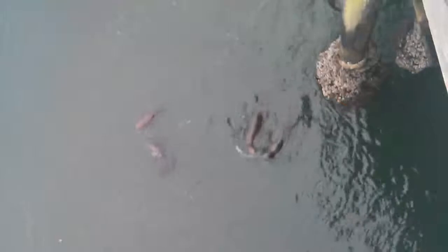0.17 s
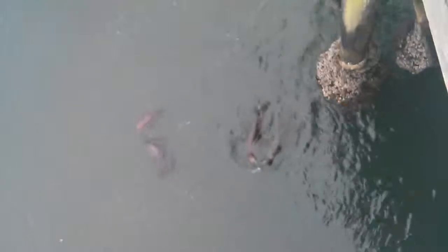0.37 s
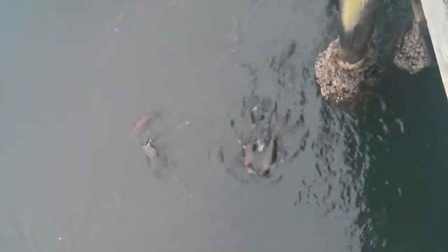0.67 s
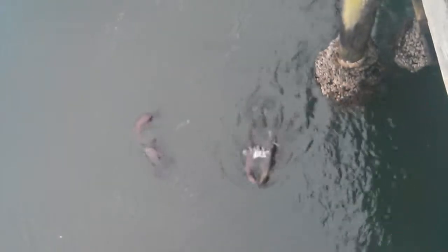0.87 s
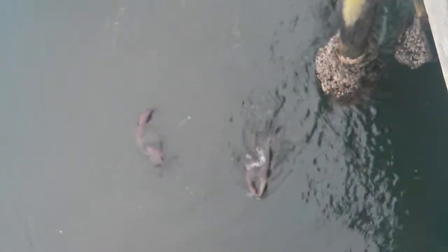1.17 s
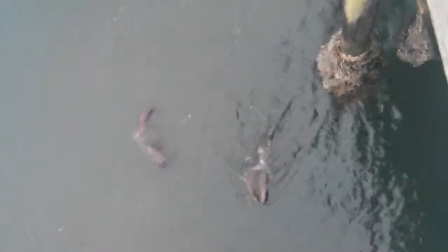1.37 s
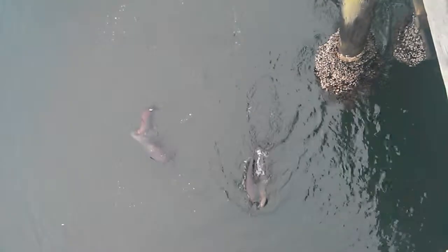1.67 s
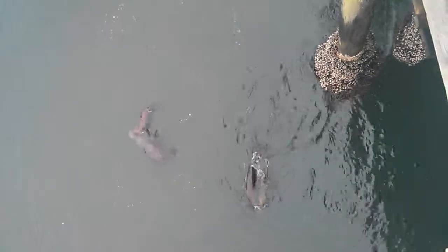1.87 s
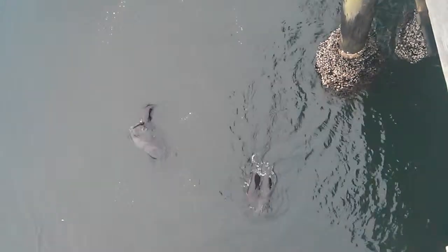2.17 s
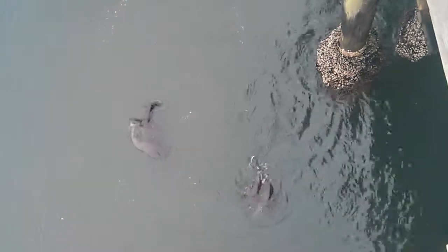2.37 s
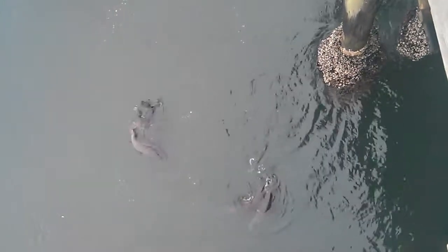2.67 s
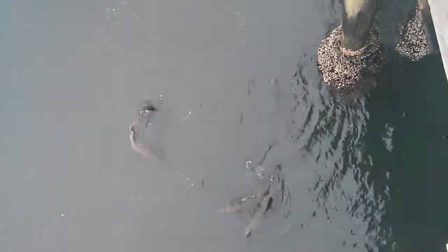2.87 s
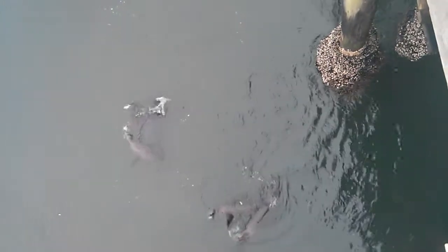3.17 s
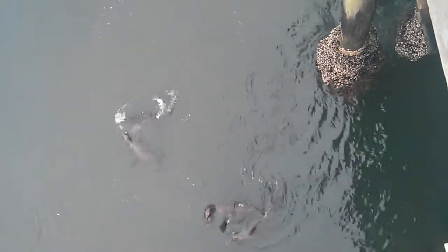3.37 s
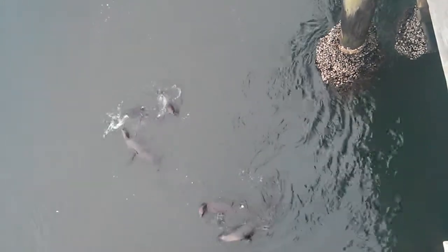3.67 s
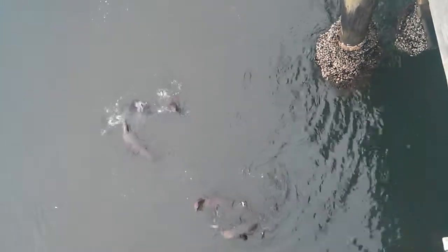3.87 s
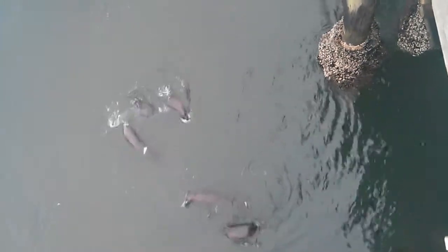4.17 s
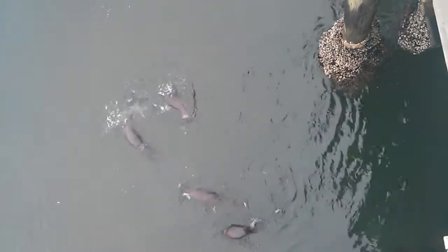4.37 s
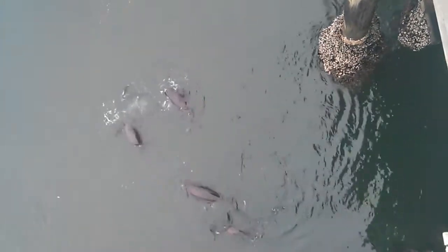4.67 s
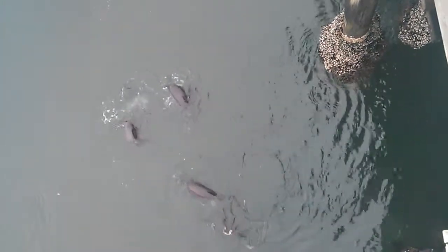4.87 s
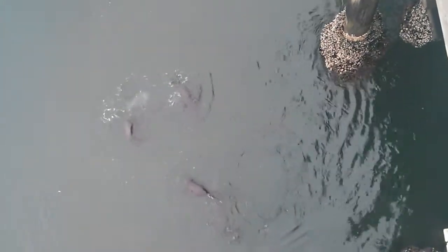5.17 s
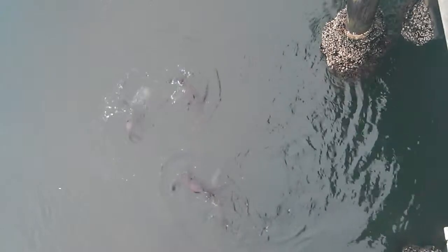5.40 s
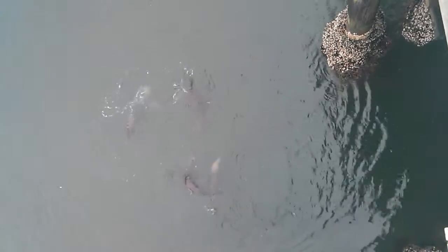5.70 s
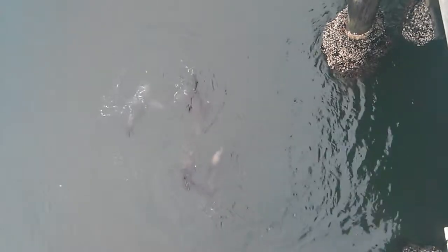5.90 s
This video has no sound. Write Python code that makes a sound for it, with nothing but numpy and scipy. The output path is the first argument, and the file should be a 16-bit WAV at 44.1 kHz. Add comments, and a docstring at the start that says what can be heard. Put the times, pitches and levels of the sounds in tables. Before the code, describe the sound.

Faint splashing from sea lions continues as a loud, nearly pure fog horn tone sounds once, drops softer and stops.

```python
"""A fog horn sounds one two-second blast over a harbour. Its diaphragm drives an almost pure tone
that scoops up to pitch, holds, sinks to a softer level and stops with short echoes from the pier.
Below the pier sea lions roll and splash: drops slap, bubbles ring, foam ticks. There is one dull
knock close by. A distant motor drones over low waterfront rumble, faint hiss and a thin whine."""
import sys
import numpy as np
from scipy import signal
from scipy.fft import rfft, irfft
from scipy.io import wavfile
from scipy.ndimage import uniform_filter1d, map_coordinates

SR = 44100
rng = np.random.default_rng(int(sys.argv[2]) if len(sys.argv) > 2 else 0)


def pcm_store(signal):
    """Save signal as 16-bit PCM."""
    levels = np.round(np.clip(np.atleast_2d(signal), -1, 1) * 32767)
    wavfile.write(sys.argv[1], SR, levels.astype(np.int16).T)


N = 266275
T = np.arange(N) / SR

# noise spectra: freq_hz, relative_density_db
HISS_SPECTRUM = [(2500, -9.5), (8500, -0.5), (12400, -2), (15800, -5)]
RUMBLE_SPECTRUM = [(25, -22), (40, -18.5), (60, -11), (85, -9.5), (122, 3), (160, -9), (220, -6),
                   (320, -11.5), (500, -26), (900, -28.5)]
SPRAY_SPECTRUM = [(5500, -25), (6800, -8), (8200, -1), (9500, -4.5), (11000, -9), (13000, -11.5),
                  (15800, -24)]
DROP_SPECTRUM = [(2400, -7), (3200, -13.5), (3800, -6.5), (4350, -1), (4900, 2), (5500, -3), (6300, -4.5),
                 (7500, -11.5)]
SLOSH_SPECTRUM = [(180, -17), (300, 0.5), (500, -1.5), (750, -3), (1000, 1.5), (1400, 0), (1900, -2),
                  (2300, -3), (3000, -12)]
HORN_AIR_SPECTRUM = [(150, -6), (320, 1.5), (480, 2.5), (600, 0), (880, 2.5), (1050, -17.5), (2200, -20)]
# waterfront rumble contour: time_s, relative_level_db
RUMBLE_CONTOUR = [(0.4, -52), (0.98, -50.5), (2.43, -61), (3.11, -58.5), (6.0, -60)]
# motor pitch, one list per pull: time_s, pitch_hz
MOTOR_PULLS = [
    [(0, 161), (.95, 154), (1.2, 159), (1.47, 171), (2.5, 196)],
    [(3.42, 143), (3.85, 150), (4.3, 153)],
    [(4.35, 190), (4.55, 179), (4.9, 181), (5.3, 176), (6.3, 182)],
]
# motor resonances: centre_hz, half_width_hz, level_db
MOTOR_RESONANCES = [(149.5, 6.5, -48), (171.5, 5, -44.5)]
# rising bubble swarms: centre_s, sigma_s, pitch_hz, level_db
BUBBLE_SWARMS = [(0.406, 0.12, 1680, -53.5), (0.833, 0.23, 620, -56), (3.35, 0.089, 1705, -51.5),
                 (3.6, 0.16, 1890, -57), (3.886, 0.073, 1514, -53), (4.914, 0.073, 1750, -61.5),
                 (5.349, .15, 2138, -73), (5.97, 0.24, 861, -70.5)]
# sea lions surfacing: peak_s, drops_db, swell_s, t60_s, spray_offset_db, slosh_offset_db
SEA_LION_SPLASHES = [(.13, -52.5, 0.07, 2, 5, 3), (.38, -52, 0.026, 1.2, 5.5, 3),
                     (.95, -51.5, .21, 1.34, 3, 2.5), (1.15, -49, 0.16, 0.95, 1.5, 3),
                     (2.22, -67, 0.056, 0.37, 8.5, 4), (2.92, -63.5, 0.046, .4, 10, -6),
                     (3.16, -55, 0.098, 2.1, 8, 1.5), (3.36, -42, 0.051, 0.88, 4.5, -7.5),
                     (3.78, -51.5, 0.25, 0.7, 2.5, -5.5), (4.161, -56.5, 0.17, 1.5, 5.5, -4),
                     (4.41, -58, 0.19, .55, 5.5, 2.5), (4.74, -66, 0.12, 1.4, 7.5, -0.5),
                     (5.7, -77.5, 0.095, 1.5, 16, 0)]
# ring of the drops, lower as they get larger, used as a ratio to its median: time_s, pitch_hz
DROP_CONTOUR = [(0, 5374), (1.2, 5826), (2.0, 4939), (3.0, 4871), (4.5, 4813), (6, 4585)]
# single air pockets and drops: start_s, pitch_hz, level_db
AIR_POCKETS = [(.226, 2640, -41), (0.6459, 1453, -37), (.837, 720, -33), (.878, 640, -34.5),
               (1.037, 1050, -33.5), (1.436, 3980, -47.5), (1.572, 2130, -50.5), (2.191, 4620, -51.5),
               (2.252, 4804, -48.5), (2.32, 4700, -54.5), (2.75, 1850, -41), (2.925, 4550, -47),
               (3.061, 4900, -43), (3.138, 1146, -41), (3.32, 1315, -36.5), (3.364, 157.5, -27),
               (3.379, 125, -27), (3.6, 1420, -37.5), (3.715, 970, -36.5), (4.031, 4780, -46.5),
               (4.29, 1800, -46.5), (4.364, 1300, -36.5), (4.368, 561, -26), (4.377, 743, -31.5),
               (4.508, 4720, -46), (4.58, 4070, -48.5), (4.616, 4040, -50), (4.729, 700, -42.5),
               (4.902, 4000, -50), (5.194, 4790, -50.5), (5.434, 4510, -52), (5.637, 733, -40.5),
               (5.813, 3970, -51)]
# hits on the water: start_s, centre_hz, peak_db, t60_s
WATER_SLAPS = [(.369, 7400, -28.5, .03), (.383, 8100, -27.5, 0.05), (.901, 7550, -24.5, 0.049),
               (1.8205, 14000, -18, .008), (1.821, 9640, -27.5, 0.0086), (2.077, 14370, -39.5, .022),
               (2.243, 7480, -37.5, 0.022), (2.458, 9600, -35, 0.025), (2.823, 7000, -26, .01),
               (2.823, 4530, -32.5, .014), (2.898, 10300, -35.5, 0.013), (3.219, 8060, -26.5, 0.019),
               (3.326, 7200, -24, 0.044), (3.471, 13500, -25.5, 0.011), (3.66, 6800, -30, 0.021),
               (3.868, 7300, -30.5, .015), (4.108, 8050, -30.5, 0.016), (4.147, 7900, -31, 0.015),
               (4.365, 4750, -33.5, 0.064), (4.368, 9000, -26.5, .036), (4.776, 7930, -41.5, .016),
               (5.205, 8360, -48, 0.15), (5.816, 8100, -39.5, 0.024)]
# modes of the knock: freq_hz, level_db, t60_s
KNOCK_MODES = [(56, -36, 0.18), (127, -25.5, .09), (222, -24, 0.017), (338, -27.5, 0.073),
               (614, -31.5, 0.018), (970, -34, 0.026)]
# horn overtones: pitch_multiple, loud_level_db, share_of_level_change
HORN_OVERTONES = [(2, -46, 0.78), (3, -70.5, 0.22), (4, -78, 0.2)]
# pier reflections: delay_s, gain_db
PIER_ECHOES = [(.0253, -15.5), (.0605, -20), (.0727, -22), (.1394, -25)]

FOAM_FADE_AT_S, FOAM_T60_S = 4.36, 3.5
HORN_ON_S, HORN_OFF_S, ATTACK_S, RELEASE_TAU_S = 1.068, 3.069, .022, .003
HORN_HZ, SCOOP_HZ, SCOOP_TAU_S, SHARP_HZ, SETTLE_TAU_S = 417.3, 48, .017, 1.1, .4
LOUD_DB, SOFT_DB, SINK_AT_S, SINK_TAU_S = -8.3, -29.1, 2.228, .089
FIFTH_RELATIVE_DB, FIFTH_AT_S, FIFTH_RISE_S = -51, 1.55, .25


def undb(db):
    """Decibels to gain."""
    return 10 ** (np.asarray(db) / 20)


def unit(x):
    """Scale to rms 1."""
    return x / np.sqrt(np.mean(x ** 2))


def since(start_s):
    """Seconds since start_s, zero before it."""
    return np.maximum(T - start_s, 0)


def contour(points):
    """Interpolate (time_s, value) points to every sample."""
    return np.interp(T, *np.transpose(points))


def fade(t, t60_s):
    """Exponential decay, 60 dB down at t60_s."""
    return np.exp(-np.log(1000) * t / t60_s)


def walk(rate_hz):
    """Smooth random wander, rms 1."""
    freq_hz = np.fft.rfftfreq(N, 1 / SR)
    return unit(irfft(rfft(rng.standard_normal(N)) * np.exp(-(freq_hz / rate_hz) ** 2), N))


def colour(x, spectrum):
    """Filter x by a spectrum, falling 36 dB per octave beyond its ends; rms 1."""
    hz, db = np.transpose(spectrum)
    octave = np.log2(np.fft.rfftfreq(N, 1 / SR) + 1)
    beyond_oct = np.abs(octave - np.clip(octave, np.log2(hz[0]), np.log2(hz[-1])))
    gain_db = np.interp(octave, np.log2(hz), db) - 36 * beyond_oct
    return unit(irfft(rfft(x) * undb(gain_db), N))


def add(out, start_s, sound):
    """Mix a sound into out at start_s."""
    i = int(np.clip(start_s * SR, 0, N - 1))
    out[i:i + len(sound)] += sound[:N - i]


def ring(hz, t60_s, rise=0):
    """Damped sine; pitch climbs by the fraction rise as it dies."""
    t = T[:int(t60_s * SR) + 2]
    return np.sin(2 * np.pi * hz * t * (1 + rise * t / t60_s / 2)) * fade(t, t60_s)


def bubble_cloud(lo_hz, hi_hz, t60_cycles, spread_db, count):
    """Tiny rising bubbles of random time, pitch and strength; rms 1."""
    out = np.zeros(N)
    for when, pitch, size in rng.random((count, 3)):
        hz = lo_hz * (hi_hz / lo_hz) ** pitch
        strength = -np.log(1 - .995 * size)
        add(out, when * N / SR, undb(spread_db * strength) * ring(hz, t60_cycles / hz, rise=.2))
    return unit(out)


def waterfront(gain_db=5.5):
    """Low rumble of the harbour."""
    return undb(contour(RUMBLE_CONTOUR) + gain_db) * colour(rng.standard_normal(N), RUMBLE_SPECTRUM)


def motor(hum_db=-57, fade_s=.15, speed_wobble=.006, waver_db=2.0):
    """A far motor pulls three times, booming where its pitch crosses a resonance."""
    out = np.zeros(N)
    for pull in MOTOR_PULLS:
        hz = contour(pull)
        start_s, end_s = pull[0][0], pull[-1][0]
        load = np.sqrt(np.clip(np.minimum(T - start_s, end_s - T) / fade_s, 0, 1))
        power = undb(hum_db) ** 2
        for centre_hz, half_width_hz, db in MOTOR_RESONANCES:
            power += (undb(db) / (1 + ((hz - centre_hz) / half_width_hz) ** 2)) ** 2
        phase = 2 * np.pi * np.cumsum(hz * (1 + speed_wobble * walk(11))) / SR
        out += load * np.sqrt(2 * power) * np.sin(phase)
    return out * undb(waver_db * walk(8.3))


def foam(level_db=-65):
    """Foam bubbles tick as they burst."""
    ticks = bubble_cloud(7000, 14000, t60_cycles=45, spread_db=2.5, count=260)
    return undb(level_db) * fade(since(FOAM_FADE_AT_S), FOAM_T60_S) * colour(ticks, SPRAY_SPECTRUM)


def swarms(width_ratio=1.13):
    """Many bubbles of one size burst together in a short gurgle."""
    out = np.zeros(N)
    cloud = bubble_cloud(1216, 2690, t60_cycles=30, spread_db=-.5, count=5000)
    for centre_s, sigma_s, hz, db in BUBBLE_SWARMS:
        band = list(zip(hz * width_ratio ** np.arange(-2, 3), (-20, -6, 0, -6, -20)))
        swell = np.exp(-((T - centre_s) / sigma_s) ** 2 / 2)
        out += undb(db) * swell * colour(cloud, band)
    return out


def churn(foam_db=-59, trickle_db=-76, lap_db=-66.5):
    """Spray, drop and slosh envelopes: splashes swell and die over foam, trickle and lapping."""
    spray_power = (undb(foam_db) * fade(since(FOAM_FADE_AT_S), FOAM_T60_S)) ** 2
    drop_power, slosh_power = undb(trickle_db) ** 2, undb(lap_db) ** 2
    for peak_s, db, swell_s, t60_s, spray_offset_db, slosh_offset_db in SEA_LION_SPLASHES:
        swell = np.exp(-(np.minimum(T - peak_s, 0) / swell_s) ** 2)
        splash = undb(db) * swell * fade(since(peak_s), t60_s)
        spray_power += (splash * undb(spray_offset_db)) ** 2
        drop_power += splash ** 2
        slosh_power += (splash * undb(slosh_offset_db)) ** 2
    return np.sqrt([spray_power, drop_power, slosh_power])


def splashing(flicker_db=1.58):
    """Sea lions churn the water: fine spray fizzes, larger drops plink, bubbles gurgle in the slosh."""
    spray_gain, drop_gain, slosh_gain = churn() * undb(flicker_db * walk(20))
    fizz = bubble_cloud(6000, 15500, t60_cycles=40, spread_db=2.5, count=8000)
    spray = colour(.6 * fizz + .7 * rng.standard_normal(N), SPRAY_SPECTRUM)
    plinks = bubble_cloud(2500, 7000, t60_cycles=45, spread_db=2, count=5000)
    drops = colour(.55 * plinks + .9 * rng.standard_normal(N), DROP_SPECTRUM)
    # drop size slides the whole patter up or down
    drop_hz = contour(DROP_CONTOUR)
    drops = map_coordinates(drops, [np.cumsum(drop_hz / np.median(drop_hz))], order=3, mode="wrap")
    gurgle = bubble_cloud(450, 2800, t60_cycles=22, spread_db=2, count=3500)
    slosh = colour(gurgle + 1.5 * rng.standard_normal(N), SLOSH_SPECTRUM)
    return spray_gain * spray + drop_gain * drops + slosh_gain * slosh


def plops(t60_at_1khz_s=.042, damping_exponent=.37, rise=.078, unevenness=.33):
    """Air pockets ring unevenly and climb in pitch near the surface; small ones die sooner."""
    out = np.zeros(N)
    for start_s, hz, db in AIR_POCKETS:
        bubble = ring(hz, t60_at_1khz_s / (hz / 1000) ** damping_exponent, rise)
        attack = 1 - np.exp(-2 * hz * T[:len(bubble)])
        unrest = unit(uniform_filter1d(rng.standard_normal(len(bubble)), int(5 * SR / hz) + 1))
        add(out, start_s, undb(db) * bubble * attack * (1 + unevenness * unrest))
    return out


def slaps(half_width_oct=.4, attack_share=.0088):
    """Flippers and falling drops hit the surface with bright cracks."""
    out, t = np.zeros(N), T[:SR // 2]
    freq_hz = np.fft.rfftfreq(len(t), 1 / SR) + 1
    for start_s, centre_hz, peak_db, t60_s in WATER_SLAPS:
        band = 1 / (1 + (np.log2(freq_hz / centre_hz) / half_width_oct) ** 4)
        envelope = (1 - np.exp(-t / (attack_share * t60_s))) * fade(t, t60_s)
        crack = irfft(rfft(rng.standard_normal(len(t))) * band, len(t)) * envelope
        add(out, start_s, undb(peak_db) * crack / np.abs(crack).max())
    return out


def knock(start_s=4.205, contact_s=.001):
    """One soft blow on heavily damped modes of alternating sign."""
    out = np.zeros(N)
    for k, (hz, db, t60_s) in enumerate(KNOCK_MODES):
        mode = ring(hz, t60_s)
        attack = 1 - np.exp(-T[:len(mode)] / contact_s)
        add(out, start_s, (-1) ** k * undb(db) * mode * attack)
    return out


def pier_response(tail_db=-21, tail_t60_s=.7):
    """Impulse response: direct path, diffuse waterfront tail and distinct pier echoes."""
    t = T[:SR // 2]
    response = rng.standard_normal(len(t)) * fade(t, tail_t60_s)
    response *= undb(tail_db) / np.linalg.norm(response)
    response[0] += 1
    for delay_s, db in PIER_ECHOES:
        response[int(delay_s * SR)] += undb(db)
    return response


def horn(flutter_hz=45, flutter_rad=.013, flutter_depth=.013, air_relative_db=-48):
    """A diaphragm drives a tuned horn; the air makes the tone flutter and the pier echoes it."""
    age_s = since(HORN_ON_S)
    hz = HORN_HZ - SCOOP_HZ * np.exp(-age_s / SCOOP_TAU_S) + SHARP_HZ * np.exp(-age_s / SETTLE_TAU_S)
    phase = 2 * np.pi * np.cumsum(hz) / SR + flutter_rad * walk(flutter_hz)
    sink = np.exp(-since(SINK_AT_S) / SINK_TAU_S)
    level_db = 20 * np.log10(undb(SOFT_DB) + (undb(LOUD_DB) - undb(SOFT_DB)) * sink)
    drive = np.minimum(age_s / ATTACK_S, 1) * np.exp(-since(HORN_OFF_S) / RELEASE_TAU_S)
    drive *= 1 + flutter_depth * walk(flutter_hz)
    pier = pier_response()

    def partial(multiple):
        """One partial by all paths, rms 1 while the note holds."""
        held_gain = abs(np.sum(pier * np.exp(-2j * np.pi * multiple * HORN_HZ * T[:len(pier)])))
        return signal.fftconvolve(np.sqrt(2) * drive * np.sin(multiple * phase), pier)[:N] / held_gain

    tone = undb(level_db) * partial(1)
    for multiple, loud_db, share in HORN_OVERTONES:
        tone += undb(loud_db + share * (level_db - LOUD_DB)) * partial(multiple)
    fifth_ramp = np.minimum(since(FIFTH_AT_S) / FIFTH_RISE_S, 1)
    fifth = undb(level_db + FIFTH_RELATIVE_DB) * fifth_ramp * partial(1.5)
    air = undb(level_db + air_relative_db) * drive * colour(rng.standard_normal(N), HORN_AIR_SPECTRUM)
    return tone + fifth + air


def scene():
    """Horn, water and harbour, heard from the pier; mono."""
    mix = horn() + splashing() + swarms() + foam() + plops() + slaps() + knock() + motor() + waterfront()
    return mix[None]


def record(dry, hiss_db=-77, whine_hz=15000, whine_db=-67, start_s=.113, cutoff_hz=15850):
    """Add hiss and a thin whine that fades late; mute before start_s; low-pass."""
    whine_fade_db = 12 * since(4.3)  # 12 dB/s from 4.3 s
    whine = undb(whine_db - whine_fade_db) * np.sqrt(2) * np.sin(2 * np.pi * whine_hz * T)
    hiss = undb(hiss_db) * colour(rng.standard_normal(N), HISS_SPECTRUM)
    lowpass = signal.ellip(10, .2, 80, cutoff_hz, fs=SR, output="sos")
    return signal.sosfilt(lowpass, (dry + hiss + whine) * (T > start_s))


dry = scene()
out = record(dry)
pcm_store(out)
```